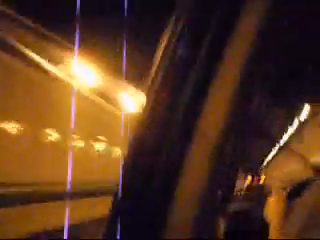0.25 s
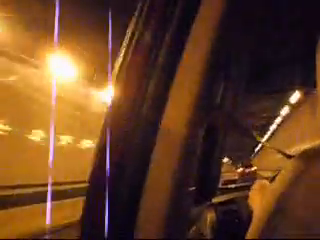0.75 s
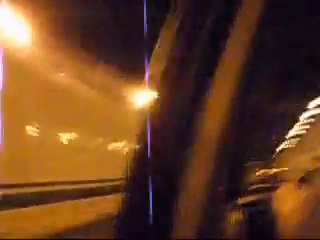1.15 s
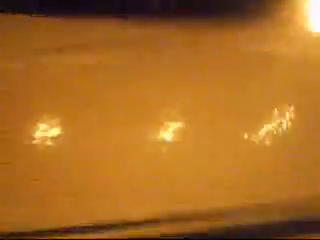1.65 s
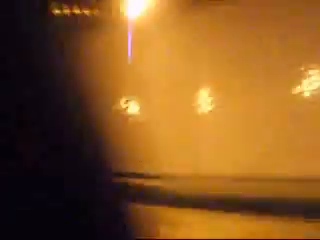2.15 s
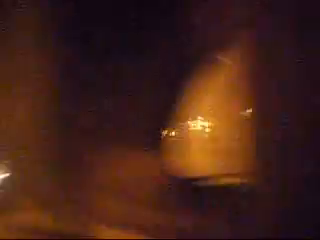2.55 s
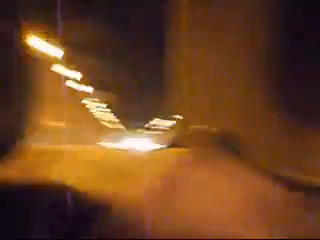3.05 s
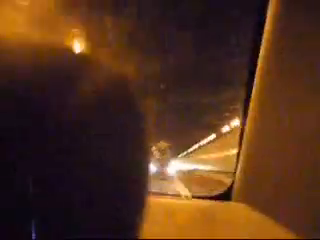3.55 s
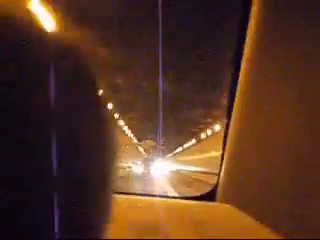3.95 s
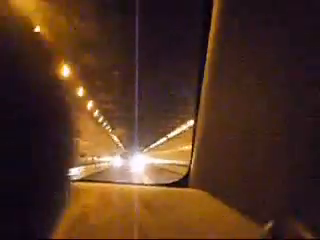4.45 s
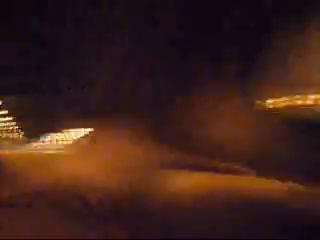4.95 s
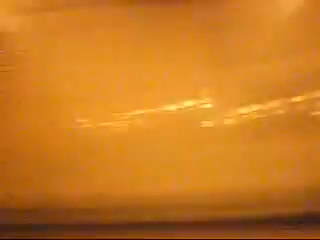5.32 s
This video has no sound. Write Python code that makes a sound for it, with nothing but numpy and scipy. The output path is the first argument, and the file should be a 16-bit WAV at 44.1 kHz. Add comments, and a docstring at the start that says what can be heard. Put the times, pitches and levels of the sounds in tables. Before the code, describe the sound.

A car rushes through a tunnel, its roar and microphone wind stuttering and popping as the sound keeps cutting out.

```python
"""Car in a tunnel, window open

Tyre roar comes back off the walls while wind buffets a small camera and snaps at its microphone.
Sharp upward peaks at listed times overload the input stage: the sound drops out, sinks, then climbs back.
The converter samples at 8 kHz and holds each value, mirroring the roar into the treble over a thin hiss."""
import sys
import numpy as np
from scipy import signal
from scipy.io import wavfile
from scipy.ndimage import uniform_filter1d

SR = 44100
rng = np.random.default_rng(int(sys.argv[2]) if len(sys.argv) > 2 else 0)


def int16_out(signal):
    """Quantize to a 16-bit WAV file."""
    q = np.round(np.clip(np.atleast_2d(signal).T, -1, 1) * 32767)
    wavfile.write(sys.argv[1], SR, q.astype(np.int16))


N = 246078
CONVERTER_HZ = 8000


def gain_of(db):
    return 10 ** (np.asarray(db) / 20)


def unit_rms(x):
    return x / np.sqrt(np.mean(x ** 2) + 1e-20)


# Each row: frequency in Hz, relative spectral density in dB.
ROAR_SPECTRUM = [(200, -22), (380, -9), (584, -7), (700, -1.5), (900, 0.5), (1220, -7.5), (2000, -21.5),
                 (4000, -39)]


def tyre_roar():
    """Tyre noise thrown back by the tunnel walls, strongest near 900 Hz."""
    roar = rushing_noise(ROAR_SPECTRUM, patch_db=1.5, flutter_db=0.94)
    return camera_gain("roar") * roar * swell(depth_share=0.022, rise_s=0.0028)


# Each row: frequency in Hz, relative spectral density in dB.
WIND_SPECTRUM = [(18, -21), (40, -21), (120, 2), (220, 2.5), (400, -0.5), (1000, -2.5), (2000, -11),
                 (4000, -34)]


def wind_buffet():
    """Wind beats on the microphone, surging just before each overload."""
    wind = rushing_noise(WIND_SPECTRUM, patch_db=2.5, flutter_db=1.0)
    return camera_gain("wind") * wind * swell(depth_share=0.17, rise_s=0.0043)


def rushing_noise(spectrum, patch_db, flutter_db):
    """Coloured noise with drifting spectral patches and a flutter shared by all frequencies."""
    frames, bin_hz = N // 256 + 5, np.fft.rfftfreq(1024, 1 / SR)
    real, imag, patches = rng.standard_normal((frames, 513, 3)).T
    patches = uniform_filter1d(patches, size=8, axis=0)
    patches = unit_rms(uniform_filter1d(patches, size=8, axis=1))
    flutter = unit_rms(uniform_filter1d(rng.standard_normal(frames), size=3))
    hz, db = np.transpose(spectrum)
    colour_db = np.interp(np.log(bin_hz + 1), np.log(hz), db, right=-90)
    spectra = (real + 1j * imag) * gain_of(colour_db[:, None] + patch_db * patches + flutter_db * flutter)
    return unit_rms(signal.istft(spectra, nperseg=1024, noverlap=768)[1][:N])


# Each row: time in seconds, roar level in dB, wind level in dB. Levels apply between overloads.
CAMERA_LEVELS = [(0.0, -10, -22), (0.6, -10, -28), (1.2, -11.5, -18.5), (1.5, -10, -24), (2.1, -9.5, -22.5),
                 (2.7, -13, -16), (3.0, -13.5, -9), (3.3, -20.5, -14.5), (3.7, -16, -11.5),
                 (4.3, -15.5, -15.5), (4.8, -18.5, -10), (5.1, -9, -20.5), (5.58, -12, -20)]


def camera_gain(source):
    """Roar and wind shift in level as the camera turns from the side window to the rear and back."""
    times_s, roar_db, wind_db = np.transpose(CAMERA_LEVELS)
    return gain_of(np.interp(np.arange(N) / SR, times_s, {"roar": roar_db, "wind": wind_db}[source]))


# Each row: start in seconds, dropout depth in dB, time to recover in seconds.
INPUT_OVERLOADS = [(0.087, 34.5, 0.06), (0.195, 23, 0.061), (0.2898, 25, 0.091), (0.4263, 5, 0.024),
                   (0.475, 5, 0.0078), (0.543, 11, 0.021), (0.562, 44.5, 0.15), (0.7698, 25.5, 0.078),
                   (0.8765, 26, 0.072), (1.032, 8.5, 0.017), (1.095, 22.5, 0.075), (1.2167, 23, 0.047),
                   (1.3497, 11, 0.018), (1.4305, 12, 0.034), (1.4847, 7.5, 0.016), (1.622, 27, 0.066),
                   (1.7221, 36.5, 0.12), (1.852, 28.5, 0.075), (1.9461, 37.5, 0.08), (2.073, 28, 0.091),
                   (2.197, 22.5, 0.051), (2.2668, 31, 0.094), (2.3698, 14.5, 0.016), (2.4297, 25.5, 0.051),
                   (2.4997, 31, 0.11), (2.6101, 29.5, 0.053), (2.669, 19.5, 0.044), (2.7678, 23, 0.072),
                   (2.8562, 25.5, 0.1), (2.9633, 33.5, 0.12), (3.0686, 33.5, 0.048), (3.1333, 43.5, 0.13),
                   (3.2679, 14.5, 0.024), (3.32, 24, 0.089), (3.4173, 7, 0.016), (3.452, 26.5, 0.084),
                   (3.5879, 14, 0.023), (3.6127, 25.5, 0.067), (3.7177, 12, 0.027), (3.7626, 26.5, 0.096),
                   (3.8635, 26, 0.093), (3.9697, 16.5, 0.036), (4.0316, 32.5, 0.15), (4.189, 27.5, 0.086),
                   (4.2895, 22, 0.061), (4.3605, 20.5, 0.038), (4.4216, 25.5, 0.099), (4.5344, 14.5, 0.024),
                   (4.5615, 35.5, 0.08), (4.6545, 14.5, 0.037), (4.686, 33.5, 0.099), (4.7977, 23.5, 0.092),
                   (4.919, 29, 0.11), (5.0385, 25, 0.068), (5.1254, 26, 0.086), (5.2273, 23, 0.052),
                   (5.2749, 15, 0.024), (5.3708, 19, 0.022), (5.4515, 28.5, 0.1)]


def dropouts(sudden_share=0.73, climb_power=1.23):
    """Gain of the overloaded input stage: a sudden fall, a slower sinking, an accelerating climb."""
    t, db = np.arange(N) / SR, np.zeros(N)
    for start_s, depth_db, recover_s in INPUT_OVERLOADS:
        sink_s = sink_time(depth_db, recover_s)
        fall = np.interp(t - start_s, [-0.0004, 0.0008, sink_s], [0, sudden_share, 1])
        climb = np.interp(t - start_s, [sink_s, max(recover_s, sink_s + 0.001)], [0, 1]) ** climb_power
        db = np.minimum(db, -depth_db * fall * (1 - climb))
    return gain_of(db)


def sink_time(depth_db, recover_s, climb_db_per_s=526, shortest_s=0.0037):
    """Seconds the gain keeps sinking: the recovery time less the climb."""
    return max(recover_s - depth_db / climb_db_per_s, shortest_s)


def swell(depth_share, rise_s):
    """Gain that rises into each overload, by a share of its depth in dB."""
    t, ramp_db = np.arange(N) / SR, np.zeros(N)
    for start_s, depth_db, _ in INPUT_OVERLOADS:
        rise = np.exp(np.minimum(t - start_s, 0) / rise_s) * (t <= start_s)
        ramp_db = np.maximum(ramp_db, depth_db * rise)
    return gain_of(depth_share * ramp_db)


def overload_kicks(width_s=0.00019, settle_s=0.003):
    """The peak that trips each overload, then the coupling capacitor's swing below zero."""
    kicks, t = np.zeros(N), np.arange(-88, 1800) / SR
    after_s = np.maximum(t - width_s, 0)
    swing = np.exp(-after_s / settle_s) * (1 - np.exp(-after_s / width_s))
    for start_s, depth_db, recover_s in INPUT_OVERLOADS:
        severity = 0.08 * depth_db * sink_time(depth_db, recover_s)
        peak_width_s = width_s * (1 + 4.1 * severity)
        peak = (0.6 + 0.017 * depth_db) * np.exp(-(t / peak_width_s) ** 2)
        add(kicks, start_s + t[0], peak - 2.53 * severity * swing)
    return kicks


def add(mix, start_s, sound):
    part = mix[round(start_s * SR):][:len(sound)]
    part += sound[:len(part)]


# Each row: start in seconds, level of the exciting impulse in dB.
WIND_SNAPS = [(2.8504, -7), (3.5598, -21), (4.79, -4)]


def wind_crackle(ticks_per_s=250, tick_db=-24, ring_hz=3500, decay_s=0.00026):
    """Gusts snap at the microphone port: a few loud ticks, and many small ones that follow the wind."""
    fires = rng.random(N) < ticks_per_s / SR
    strengths = rng.standard_normal(N) * gain_of(3.9 * rng.exponential(1, N))
    impulses = gain_of(tick_db) * camera_gain("wind") * unit_rms(fires * strengths)
    for start_s, impulse_db in WIND_SNAPS:
        add(impulses, start_s, gain_of([impulse_db]))
    t = np.arange(60) / SR
    ring = np.sin(2 * np.pi * ring_hz * t) * np.exp(-t / decay_s)
    return signal.oaconvolve(impulses, ring)[:N]


def converter(x, loudness_db):
    """Coarse sample-and-hold; its step error, a held noise, grows with the sound."""
    held_index = np.floor(np.arange(N) * CONVERTER_HZ / SR) * SR / CONVERTER_HZ
    step_error = gain_of(-27.5 + 0.64 * loudness_db) * rng.standard_normal(N)
    return np.interp(held_index, np.arange(N), x) + step_error[held_index.astype(int)]


def thin_hiss(loudness_db, base_db=-31.5, knee_db=-34.5, top_hz=11500):
    """Wide hiss, notched at the converter's rate; it dies away in the deepest dropouts."""
    hiss = signal.lfilter(*signal.iirnotch(CONVERTER_HZ, Q=9.0, fs=SR), rng.standard_normal(N))
    hiss = signal.sosfilt(signal.butter(4, top_hz, fs=SR, output="sos"), hiss)
    below_knee_db = np.minimum(loudness_db - knee_db, 0)
    return gain_of(base_db + 0.22 * loudness_db + below_knee_db) * hiss


def scene():
    """Roar, wind and crackle at the microphone, in mono."""
    return (tyre_roar() + wind_buffet() + wind_crackle())[None]


def record(dry):
    """Overloads, clipping near full scale, converter, hiss, band limit."""
    dc_offset, band_edge_hz = 0.004, 12930
    ducked = dry[0] * dropouts()
    clipped = np.clip(ducked + overload_kicks() + dc_offset, -0.98, 0.98)
    envelope = abs(uniform_filter1d(abs(ducked), size=300))
    loudness_db = 20 * np.log10(envelope + 1e-6)
    converted = converter(clipped, loudness_db) + thin_hiss(loudness_db)
    lowpass = signal.firwin(511, band_edge_hz, window=("kaiser", 9), fs=SR)
    return np.clip(signal.oaconvolve(converted, lowpass, "same"), -1, 1)[None]


dry = scene()
out = record(dry)
int16_out(out)
```